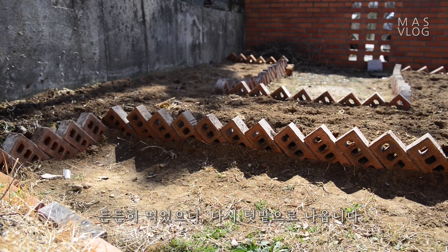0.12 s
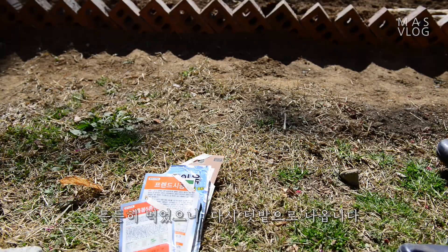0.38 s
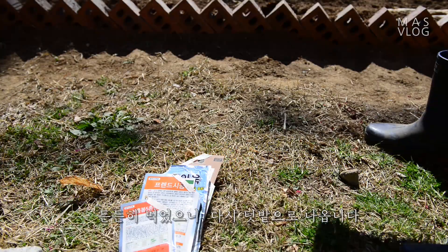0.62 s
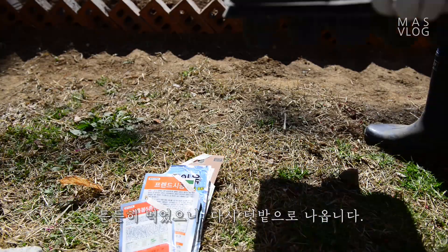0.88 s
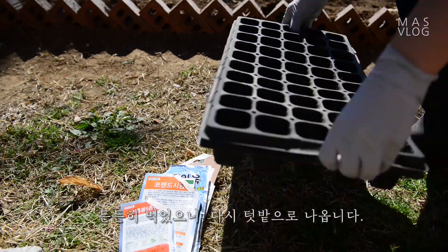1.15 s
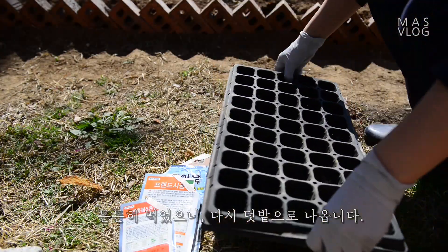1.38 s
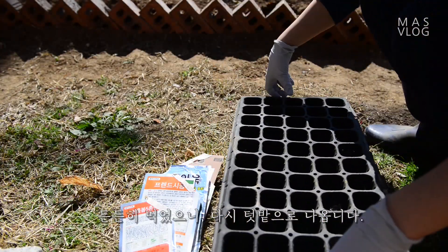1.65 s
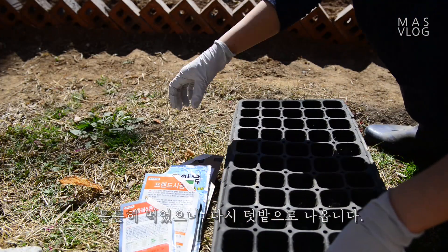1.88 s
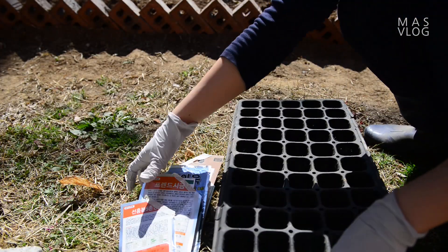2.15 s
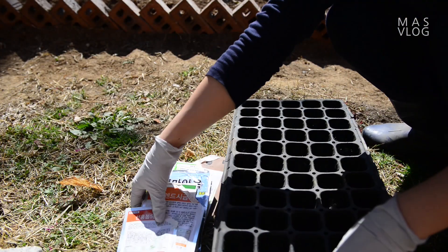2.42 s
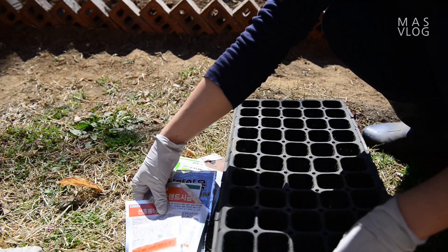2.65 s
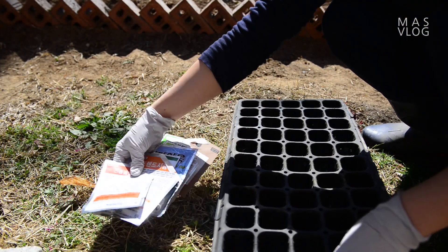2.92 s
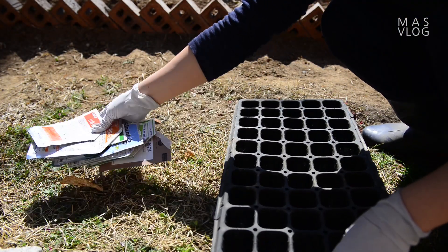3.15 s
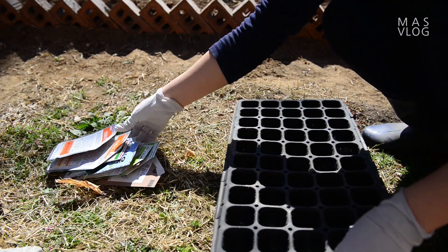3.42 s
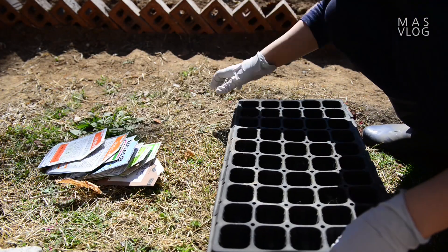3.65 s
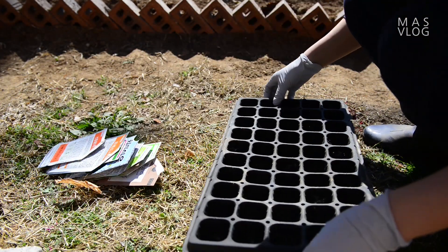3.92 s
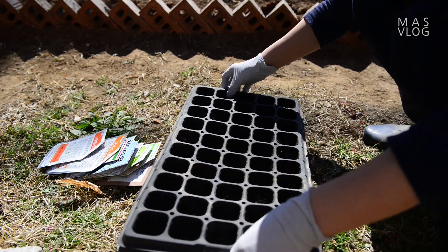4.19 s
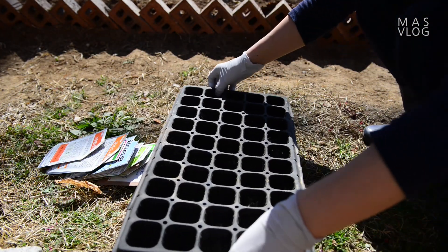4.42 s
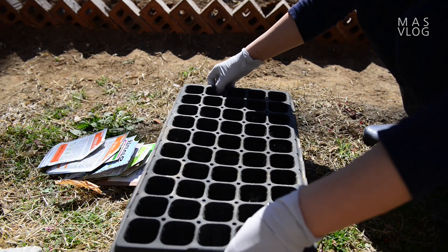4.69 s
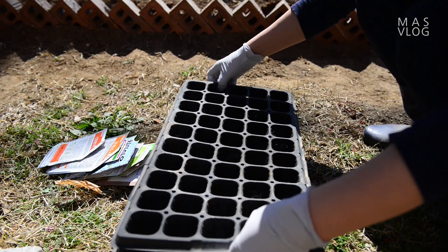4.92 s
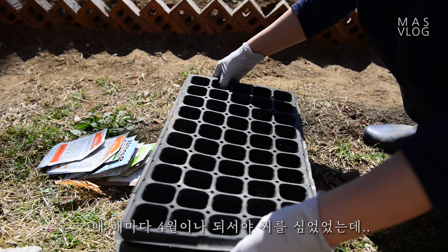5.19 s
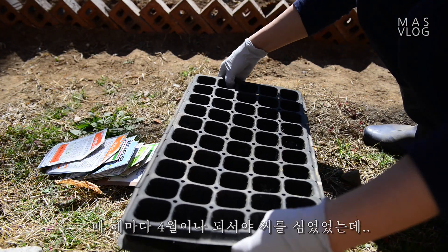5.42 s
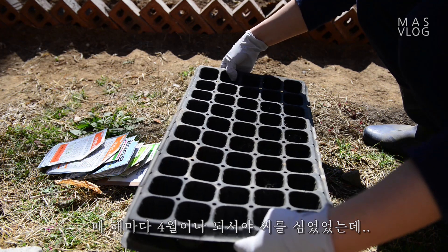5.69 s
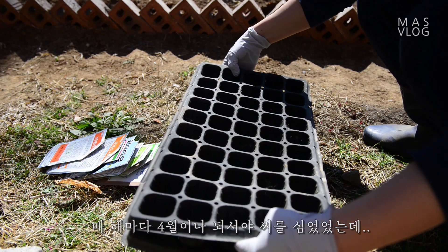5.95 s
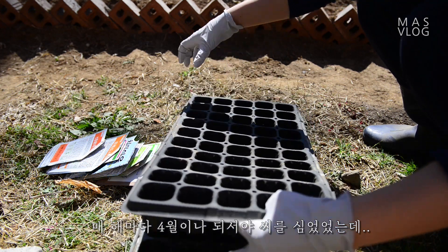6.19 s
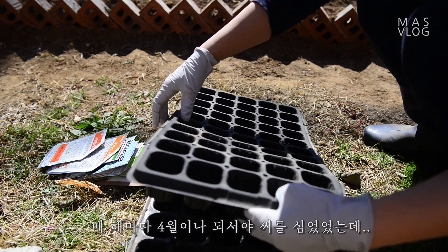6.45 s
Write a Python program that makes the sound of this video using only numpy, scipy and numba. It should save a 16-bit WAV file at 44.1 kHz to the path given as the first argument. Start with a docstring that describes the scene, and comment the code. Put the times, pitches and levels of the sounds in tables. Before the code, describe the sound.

A short low wind rumble stops abruptly, then thin plastic trays are set on dry grass close to the microphone with sharp, bright snaps. Small papery clicks follow in a quieter stretch. The trays are then shifted with denser crackles and straw scratching, and finally prised apart with hollow, loud cracks. Outdoors, dry, with faint hiss beneath.

```python
"""A dry lawn, close to the microphone: thin plastic seedling trays are lowered, shifted and prised apart.
Buckling walls crack as sprays of short dying sines; the hollow cells ring near 650 Hz after them.
Straws scratch underneath in bunched slips; paper packets are moved aside midway.
Low filtered noise makes the breeze, strongest in a brief windy opening shot that is cut off, and the thump of
the loudest crack; a faint garden hiss lies beneath."""
import sys
import numpy as np
from scipy import signal
from scipy.fft import rfft, irfft
from scipy.io import wavfile
from numba import njit

SR = 44100
rng = np.random.default_rng(int(sys.argv[2]) if len(sys.argv) > 2 else 0)


def put_to_file(sound):
    """Save the sound as 16-bit audio at rate SR, in the file named by the first command-line argument."""
    columns = np.atleast_2d(sound).T  # one column per channel
    safe = np.clip(columns, -1, 1)
    whole_steps = np.round(safe * 32767)
    wavfile.write(sys.argv[1], SR, whole_steps.astype(np.int16))


def boost_factor(decibels):
    """Convert a level in decibels to a linear amplitude factor."""
    exponent = np.asarray(decibels, float) / 20
    return 10 ** exponent


N = 289957  # samples

# Low buffeting at the microphone. Each row: frequency in Hz, relative level in dB.
BUFFET_COLOUR = [(8.8, -42.5), (15, 5), (74, -0.5), (155, -11.5), (327, -25.5), (395, -39), (419, -44),
                 (500, -44.5), (650, -85), (1100, -120)]
# Low surges at the microphone: puffs of wind, and at 5.7 s the thump of the loudest crack.
# Each row: moment in seconds, peak level in dB, time to fall 10 dB either side in seconds.
SURGES = [(.27, -40, .04), (.5, -60.5, 0.02), (2.95, -53, .35), (3.45, -57.5, 0.52), (5.25, -50, 0.14),
          (5.7, -41, .05), (5.85, -55, .3), (6.5, -61.5, 0.56)]
# A windy shot is cut off at CUT_S; in the next shot only lulls and surges are heard.
CUT_S, EXPOSED_DB, LULL_DB = .355, -37.5, -65.5
# Garden hiss. Each row: frequency in Hz, relative level in dB.
HISS_COLOUR = [(12, -22), (20, 1.5), (50, -10.5), (172, -12.5), (367, -16), (825, -17.5), (1000, -21.5),
               (2670, -25.5), (3160, -26.5), (4060, -25.5), (14300, -32), (16000, -36.5)]
HISS_DB = -59

# Cracks and taps of the trays. Each row: moment in seconds, strength in dB, hollowness in dB,
# brittleness in dB (both relative to the strength), tearing time in ms.
CRACKS = [(.352, -46, 1, -17, 12.36), (.567, -43.5, -2, -4, 9.87), (.606, -44, -1, -6.5, 2.81),
          (.82, -16.5, -10.5, -13.5, 2.69), (.849, -43, -1, -6, 0.9), (.949, -27.5, -24, -4, 1.05),
          (1.038, -46.5, -20, 2.5, 3.5), (1.097, -22, -17, -12.5, 1.5), (1.205, -32, -14, -3, 1.92),
          (1.218, -36, -12, -6, 0.93), (1.229, -10.5, -23.5, -2.5, 1.94), (1.261, -40.5, -10, -6, 5.1),
          (1.327, -44.5, -10, -6.5, 2.16), (1.34, -43, -8, 1, 1.1), (1.388, -21, -10, -3.5, 7),
          (1.466, -54, 2, 4, 2), (1.489, -14, -30, -7.5, 1.2), (1.548, -30, 11, -17, 3),
          (1.579, -12.5, -22, -6, 2), (1.689, -39.5, -9, -5, 3.49), (1.766, -31, -9.5, -14, 12),
          (1.885, -37.5, -5.5, -14, 3.54), (1.997, -42.5, -14, -2, 4.4), (2.307, -45.5, -3, -8, 4.63),
          (2.414, -36.5, -16, -3, 1.46), (2.511, -29.5, -8, -19, 0.967), (2.516, -31.5, -9.5, -12.5, 0.87),
          (2.58, -42.5, -3.5, -8, 1.54), (2.616, -37.5, -9, -4, 1.29), (2.627, -30.5, -14.5, -18, 1.1),
          (2.728, -25, -14.5, -28, 1.2), (2.798, -33.5, -11.5, -26, 2.12), (2.852, -26, -18, -11, 1),
          (2.906, -41, -4, -9, 10), (2.965, -39.5, -7.5, -5.5, 4.05), (3.195, -57, -6, 6, 3),
          (3.268, -49.5, -6.5, 9, 2.83), (3.346, -50, 6, 3, 1.2), (3.38, -19.5, -12, -8, 1.2),
          (3.413, -29, -13.5, -5, 1.4), (3.424, -29, -11, -5.5, 1), (3.545, -38.5, -10.5, 7, 2.7),
          (3.692, -36, -5.5, -12.5, 2.01), (3.719, -41.5, -7, -4, 1.3), (3.843, -34.5, 2, -5.5, 6.25),
          (3.877, -36.5, -3.5, -10, 2.03), (4.029, -25.5, -9, -6, 1), (4.059, -26, -9, -15, 1.93),
          (4.101, -30.5, -24, -2.5, 1.63), (4.128, -37.5, -17, 6, 1.63), (4.205, -38.5, -9.5, 4, 0.79),
          (4.262, -34, -16, -5, 1.83), (4.306, -23, -1, -16, 1), (4.341, -18, -20.5, -16.5, 1.47),
          (4.365, -29, -7, -4.5, 1), (4.403, -31.5, -12, -1, 0.93), (4.462, -12, -17.5, -11.5, 1.014),
          (4.497, -19.5, -12, -6.5, 2.63), (4.528, -19.5, -7.5, -10, 9.2), (4.648, -24, -4.5, -9.5, 6.68),
          (4.713, -27, 3, -22, 1), (4.77, -39, 0, -4, 2.7), (4.797, -36.5, 5, -2.5, 2.47),
          (4.872, -34, 3.5, -9, 1.065), (5.012, -32.5, -4.5, -9.5, 2.86), (5.21, -39.5, 4.5, -5.5, 1.21),
          (5.34, -33, 10, -11.5, 9), (5.375, -29, 1, -13.5, 1.32), (5.389, -29.5, 8.5, -1, 4.11),
          (5.408, -35, 5, -4, 1.2), (5.437, -7.5, 0, -8.5, 1.91), (5.513, -28, 6, -10, 5.73),
          (5.608, -22.5, 2.5, -6, 2.34), (5.641, -30, 7.5, -11.5, 6.68), (5.696, -2.5, -3, -10, 3),
          (5.728, -17, 2.5, -8, 1.45), (6.068, -22.5, 3, -9, 2.12), (6.115, -21.5, 0.5, -7.5, 11.05),
          (6.144, -21, -1.5, -9.5, 10.65), (6.212, -24.5, -6, -9.5, 9.24), (6.389, -41, 0, -6, 10),
          (6.475, -35, 4.5, -6, 7.25)]
# Colour of a cracking tray wall. Each row: frequency in Hz, relative level in dB.
WALL_COLOUR = [(900, -6.5), (1400, 1.5), (2100, 0.5), (3200, -0.5), (4500, -3), (6000, -9.5)]
# Colour of the brittle top, the plastic edges. Each row: frequency in Hz, relative level in dB.
BRITTLE_COLOUR = [(5500, -15), (6300, -3), (7500, 5), (8800, -1.5), (10000, -12.5), (13000, -6.5),
                  (16000, -18.5)]
# Air and floor of the cells. Each row: frequency in Hz, relative level in dB, nominal ring time in seconds.
CELLS = [(403.8, -5.5, 0.101), (451.3, -12, 0.123), (547.8, -5.5, 0.0514), (574.8, -2, 0.0928),
         (640.34, -4, 0.1877), (688.1, -1, 0.0944), (762.6, -2.5, 0.1185), (863.7, -1, 0.0747),
         (941, -9, 0.147), (1088, -6, 0.0803)]
# A hollow blow shakes more of the tray and dies later, and so does a long tear.
DYING_S, DYING_DB_PER_HOLLOW_DB, DYING_S_PER_TEAR_S = .042, .25, 3.5
# Paper packets are handled in this span; their crackles die sooner.
PAPER_FROM_S, PAPER_UNTIL_S, PAPER_DYING = 2.3, 3.45, .45
# A glancing snap misses the deep cells: tilt in dB per octave and dB of hollowness.
CELL_TILT_DB = -.4
# The first edge of a snap: level over the wall, pitch when brittleness equals hollowness, ring time.
TICK_DB, TICK_HZ, TICK_S = 4, 2400, .003

# Drags over the grass. Each row: start in seconds, length in seconds, relative force at the start in dB,
# growth to the end in dB, hollowness in dB.
STROKES = [(.36, .06, -56, -4, -4), (.55, .1, -56, -3, -3), (.66, .16, -60, 7, -2.5),
           (0.841, .13, -50, -8, -4), (1.471, 0.0544, -62, 12, 6), (1.549, .04, -41, 0, -3),
           (1.59, .08, -34, -4, -6), (1.685, .135, -41, -6, -6), (1.82, .16, -52, -10, -4),
           (2.151, 0.164, -63, 4.5, 2.5), (2.346, .22, -44, -9, -9), (2.567, .16, -50, 0, -7),
           (2.74, .07, -47, 0, -6), (2.82, .16, -54, 6, -1), (2.99, .2, -56, -5, -8),
           (3.2, .175, -62, 11, -12), (3.378, .075, -39, -5, -14), (3.472, 0.331, -49, -7.5, -4),
           (3.825, .215, -43, 4, -4), (4.039, 0.427, -40.5, -7.5, -5.5), (4.44, .07, -39, 6, -1),
           (4.51, .08, -32, -6, -5), (4.592, 0.345, -42.5, -5, 4.5), (4.96, .04, -53, 0, 3.5),
           (5.03, .11, -49, 0, 3), (5.14, .07, -56, 0, 6), (5.21, .08, -49, -2, 5), (5.3, .13, -45, 2, 9),
           (5.44, .12, -37, -9, 5), (5.57, .12, -48, 4, 9), (5.709, .07, -31, -14, -6),
           (5.78, .15, -47, -13, 5), (5.93, .12, -58, 13, 4), (6.065, 0.2243, -33, -5.5, 1.5),
           (6.305, 0.2653, -50, 5, 4.5)]
# A drag sets in around its start within GRIP_S and fades within LET_GO_S after its end.
GRIP_S, LET_GO_S = 0.0149, 0.0179
# Colour of a straw scratch. Each row: frequency in Hz, relative level in dB.
STRAW_COLOUR = [(900, -4.5), (1350, 2), (1650, 0), (2050, -0.5), (3000, -5), (4500, -2.5), (6000, -9)]
# Tray walls kept ringing by a drag. Each row: frequency in Hz, relative level in dB, nominal ring time in seconds.
PANELS = [(1135, -3, 0.029), (1392, 2, 0.045), (1892.4, 2.5, 0.0436), (2057.3, 0, 0.05), (2395, -8, 0.041),
          (2779, 0.5, 0.025), (3377, -7, 0.037), (4647, -3, 0.0277)]
# The finer the contact, the less the cells sound and the more the edges crackle.
CRACKLE_DB, CRACKLE_DB_PER_HOLLOW_DB = -10, -0.344
# Grass and clothes stir faintly between the drags.
STIR_DB, STIR_HOLLOW_DB = -66, -8.5


def colour(points, hz):
    """Level in dB at any pitch, read from a colour table along log frequency."""
    table_hz, db = np.transpose(points)
    return np.interp(np.log(hz), np.log(table_hz), db)


def noise(points, db):
    """Random noise filtered to a colour, brought to unit spread, then set to a level."""
    hz = np.maximum(np.arange(N // 2 + 1) * SR / N, 1)
    spectrum = rfft(rng.standard_normal(N)) * boost_factor(colour(points, hz))
    x = irfft(spectrum, N)
    return boost_factor(db) * x / np.std(x)


def walk(rate, s):
    """Random wandering of spread near 1, with a new value rate times a second."""
    return np.interp(s * rate, np.arange(1000), rng.standard_normal(1000))


def buffeting():
    """Low pressure noise at the microphone: a breeze in uneven puffs, and the thump of the loudest crack."""
    s = np.arange(N) / SR
    surges = sum(boost_factor(2 * db - 20 * np.abs(s - at) / fall) for at, db, fall in SURGES)
    exposed = boost_factor(2 * EXPOSED_DB) * np.clip((CUT_S - s) / 0.011, 0, 1)
    db = 10 * np.log10(boost_factor(2 * LULL_DB) + surges + exposed)
    return noise(BUFFET_COLOUR, db + 0.73 * walk(25, s))


def garden_hiss():
    """Steady, faint broadband noise of the garden."""
    return noise(HISS_COLOUR, HISS_DB)


@njit
def add(out, start, hz, gain, t60, phase):
    """Adds one dying sine per row, followed down to -60 dB."""
    for k in range(len(start)):
        turn = np.exp(2j * np.pi * hz[k] / SR - np.log(1000) / (t60[k] * SR))
        z = gain[k] * np.exp(1j * phase[k])
        for i in range(start[k], min(len(out), start[k] + int(t60[k] * SR))):
            out[i] += z.imag
            z *= turn


def ring(s, hz, gain, t60, phase):
    """Sum of many damped modes, each set off at its own moment."""
    out = np.zeros(N)
    rows = np.broadcast_arrays(hz, gain, np.clip(t60, 1e-4, 1), phase)
    start = np.ravel(np.clip(s, 0, None) * SR).astype(np.int64)
    add(out, start, *(np.ravel(row) * 1. for row in rows))
    return out


def sheet(s, db, t60, tear_ms, points, tilt_db, ring_s, count):
    """A buckling sheet lets go in a spray of damped splinters that swells over the tear and then dies."""
    u = rng.random((len(s), count, 4))
    hz = points[0][0] * (points[-1][0] / points[0][0]) ** u[..., 0]
    # high modes lose their energy sooner
    t60 = t60[:, None] * (2500 / hz) ** 0.539
    tear = tear_ms[:, None] / 1000
    span = tear + .045
    late = span * u[..., 1] ** 2
    after = np.maximum(late - tear, 0)
    # a quick snap, then the sheet settles more slowly
    dying = boost_factor(-60 * after / t60) + boost_factor(-20.5 - 60 * after / 0.098)
    swell = np.minimum(late / tear, 1) ** 0.62 * dying
    db = db[:, None] + colour(points, hz) + tilt_db[:, None] * np.log2(hz / np.median(hz))
    # evens out the crowding of splinters at early moments and low pitches
    even = np.sqrt(u[..., 1] * span * hz / hz.mean() / count / ring_s)
    splinter_s = ring_s * (0.771 + 1.098 * u[..., 2])
    return ring(s[:, None] + late, hz, boost_factor(db) * swell * even, splinter_s, 2 * np.pi * u[..., 3])


def hollow_cells(s, cell_db, hollow_db, t60, tear_ms):
    """Air and floor of the cells resonate, struck one after another just behind each snap."""
    # three neighbours of each cell, a little apart in pitch
    hz, db, ring_s = np.repeat(np.transpose(CELLS), 3, axis=1)
    u = rng.random((len(s), len(hz), 3))
    late = (0.15005 * t60 + tear_ms / 1000)[:, None] * u[..., 0] ** 1.6
    db = db + CELL_TILT_DB * np.minimum(hollow_db, 0)[:, None] * np.log2(hz / 700)
    gain = boost_factor(cell_db[:, None] + db - 11.0)
    ring_s = ring_s * (t60[:, None] / 0.091) ** 0.405
    return ring(s[:, None] + late, hz * (.94 + 0.1234 * u[..., 1]), gain, ring_s, 2 * np.pi * u[..., 2])


def cracks():
    """Each snap rings the walls, their brittle top and, a little later, the hollow cells."""
    s, wall_db, hollow_db, brittle_db, tear_ms = np.transpose(CRACKS)
    cell_db, top_db = wall_db + hollow_db, wall_db + brittle_db
    t60 = DYING_S * boost_factor(DYING_DB_PER_HOLLOW_DB * hollow_db) + DYING_S_PER_TEAR_S * tear_ms / 1000
    t60 = t60 * np.where((s > PAPER_FROM_S) & (s < PAPER_UNTIL_S), PAPER_DYING, 1)
    t60, tear_ms = np.maximum(t60, .005), np.maximum(tear_ms, .2)
    # blows that fill the cells are dull, brittle snaps are bright
    tilt_db = 0.332 * (top_db - cell_db)
    walls = sheet(s, wall_db + 13.5, t60, tear_ms, WALL_COLOUR, tilt_db, 0.00768, count=350)
    top = sheet(s, top_db + 15.5, 0.867 * t60, tear_ms, BRITTLE_COLOUR, 0 * s, 0.00486, count=350)
    cells = hollow_cells(s, cell_db, hollow_db, t60, tear_ms)
    # a slow tear has little of the first edge
    tick_hz = TICK_HZ * boost_factor(.3 * brittle_db - .3 * hollow_db)
    tick = ring(s, tick_hz, boost_factor(wall_db + TICK_DB) / (1 + tear_ms / 1.5), TICK_S, 0)
    return walls + top + cells + tick


def force(s):
    """Force of all drags at times s, in dB, as straws, cells and edges feel it."""
    start, length, db, growth_db, hollow_db = np.transpose(STROKES)[..., None]
    grip = np.clip((s - start) / GRIP_S + .5, 0, 1)
    let_go = np.clip((start + length - s) / LET_GO_S + 1, 0, 1)
    strokes = (grip * let_go * boost_factor(db + growth_db * (s - start) / length)) ** 2
    stir = boost_factor(2 * STIR_DB) * (s > CUT_S) + 1e-10
    power = np.vstack([strokes, stir])
    hollow_db = np.vstack([hollow_db, [STIR_HOLLOW_DB]])
    edge_db = CRACKLE_DB + CRACKLE_DB_PER_HOLLOW_DB * hollow_db
    shares_db = 0 * hollow_db, hollow_db, edge_db
    return [10 * np.log10(np.sum(power * boost_factor(2 * share_db), axis=0)) for share_db in shares_db]


def grains(s, db, hz, cycles, scatter_db, count):
    """Tiny slips at times s, most of them small, a few large, each ringing for so many cycles."""
    size = boost_factor(scatter_db * rng.exponential(size=count))
    size = size / np.sqrt(np.mean(size ** 2) * count)
    return ring(s, hz, size * boost_factor(db) * np.sqrt(hz), cycles / hz, 0)


def scratch(points, db, s, cycles, scatter_db):
    """Slips of straws or edges, with pitches strewn evenly over a colour."""
    hz = rng.uniform(points[0][0], points[-1][0], len(s))
    return grains(s, db + colour(points, hz), hz, cycles, scatter_db, count=len(s))


def shake(modes, db, s, detune, share, scatter_db):
    """Slips that each knock one mode of the tray, for a share of its nominal ring time."""
    hz, mode_db, t60 = np.transpose(modes)[:, rng.integers(len(modes), size=len(s))]
    hz = hz * (1 + detune * rng.standard_normal(len(s)))
    return grains(s, db + mode_db, hz, share * t60 * hz, scatter_db, count=len(s))


def drag():
    """Straws slip under the tray in bunches; every bunch shakes walls, edges and cells together."""
    bunch = rng.standard_normal(1000)

    def slips(axis, count):
        """Force of the drag at random moments, and those moments."""
        s = rng.uniform(0, N / SR, count)
        shared = 2.33 * np.interp(s * 90, np.arange(len(bunch)), bunch)
        return force(s)[axis] + shared + 1.38 * walk(40, s), s

    db, s = slips(axis=0, count=30000)
    straws = scratch(STRAW_COLOUR, db + 11.5, s, 18.3, 2.01)
    db, s = slips(axis=0, count=8000)
    panels = shake(PANELS, db + 1.0, s, 0.0156, 0.916, 1.93)
    db, s = slips(axis=1, count=12000)
    cells = shake(CELLS, db + 7.0, s, 0.0402, 0.727, 2.75)
    db, s = slips(axis=2, count=60000)
    edges = scratch(BRITTLE_COLOUR, db + 15.0, s, 22.23, 1.87)
    return straws + panels + cells + edges


def scene():
    """Everything as it reaches the one microphone; the trays' sounds carry no bass below about 330 Hz."""
    no_bass = signal.butter(3, 330, "highpass", fs=SR, output="sos")
    trays = signal.sosfilt(no_bass, cracks() + drag())
    return (trays + buffeting() + garden_hiss())[None]


def band_limit(x):
    """A steep low-pass at the top of the band."""
    return signal.sosfilt(signal.butter(12, 16650, fs=SR, output="sos"), x)


def record(dry):
    """The microphone signal, with any peak beyond full scale clipped."""
    mix = np.clip(dry, -1, 1)
    return band_limit(mix)


dry = scene()
out = record(dry)
put_to_file(out)
```